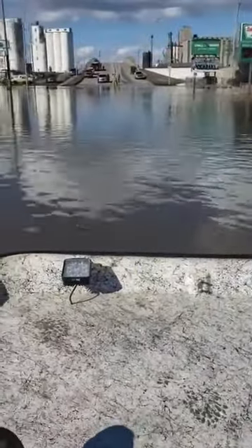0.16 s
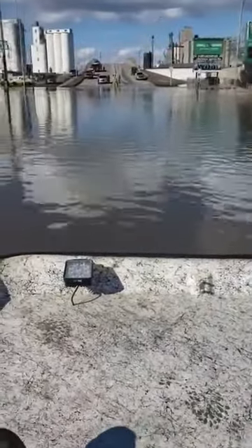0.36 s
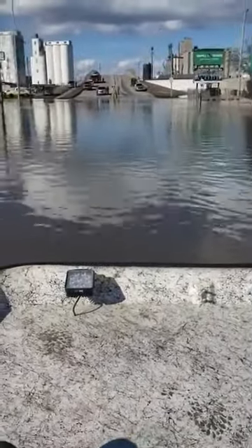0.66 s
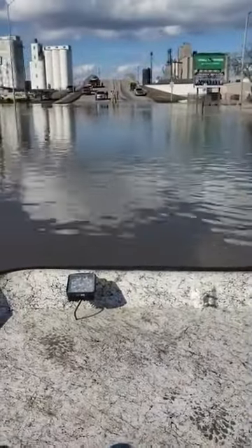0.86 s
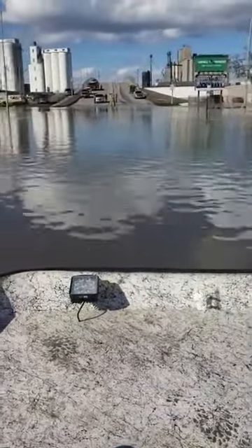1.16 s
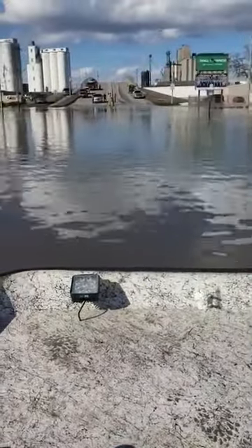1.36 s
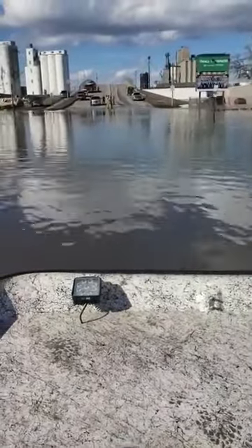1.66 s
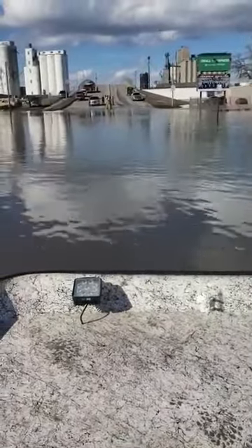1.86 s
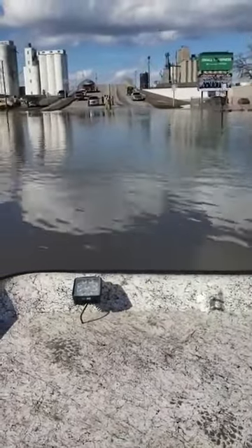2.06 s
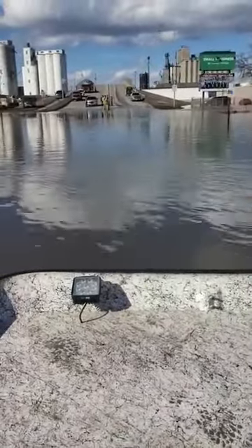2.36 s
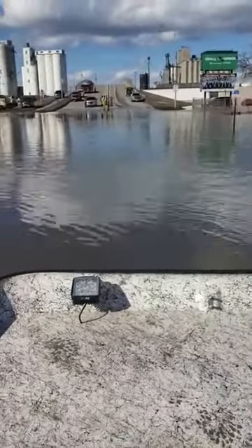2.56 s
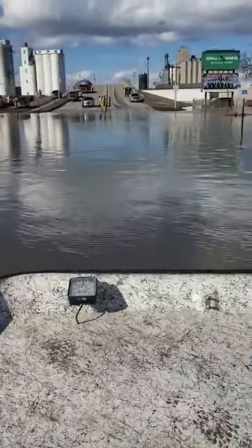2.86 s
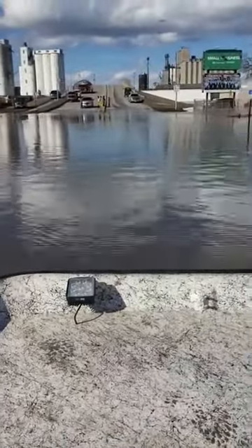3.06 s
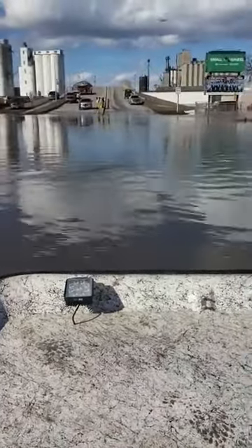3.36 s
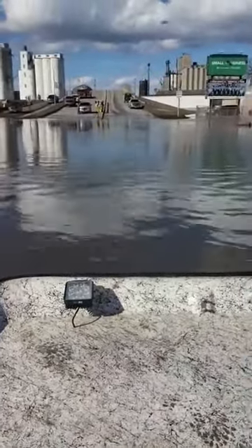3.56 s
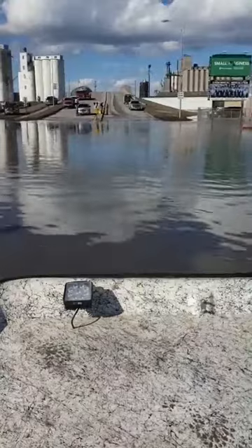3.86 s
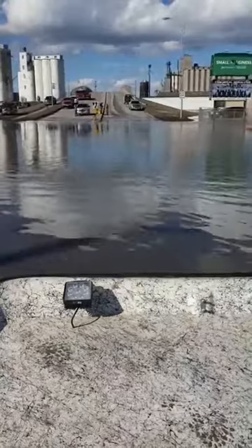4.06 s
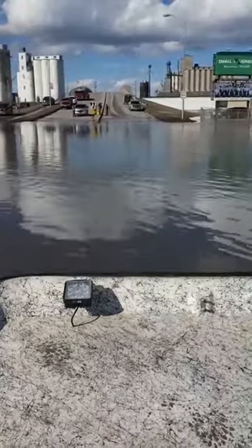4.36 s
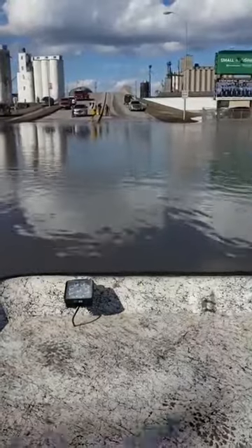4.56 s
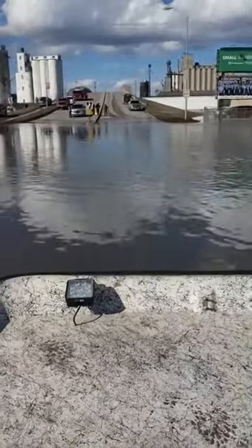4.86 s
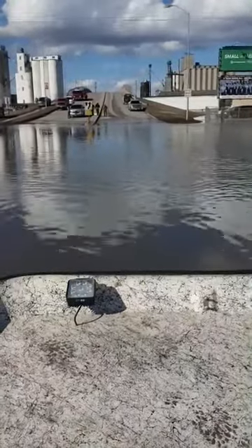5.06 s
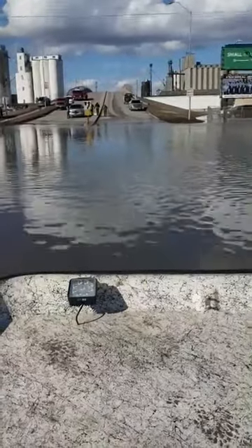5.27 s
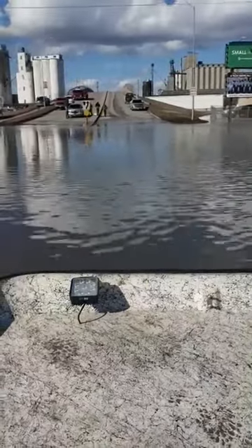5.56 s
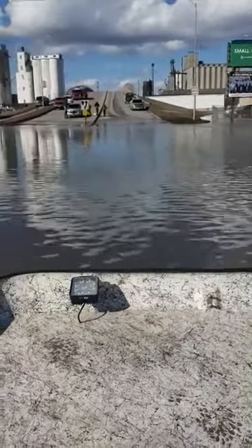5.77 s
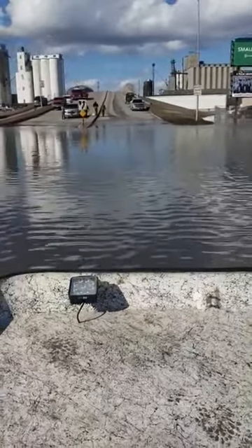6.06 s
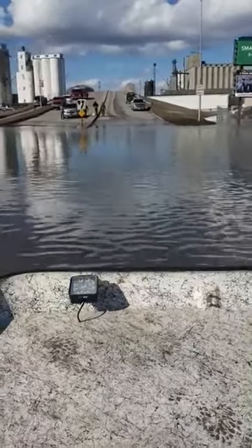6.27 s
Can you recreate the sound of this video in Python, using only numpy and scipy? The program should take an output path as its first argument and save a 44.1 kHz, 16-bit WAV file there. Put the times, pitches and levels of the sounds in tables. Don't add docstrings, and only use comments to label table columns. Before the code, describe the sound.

A continuous low motor hum with blade beating and a breathy air rush, heard from the bow on a two-channel phone. It holds steady, falters and sinks in pitch with thinner spray, growls unevenly at lower speed, then swells and rises without quite reaching its first pitch. Wind gusts bump softly against the microphone throughout; open air, no echo, slightly processed, gritty treble.

```python
import sys
import numpy as np
from scipy import signal
from scipy.io import wavfile
from scipy.ndimage import uniform_filter1d

SR = 44100
rng = np.random.default_rng(int(sys.argv[2]) if len(sys.argv) > 2 else 0)


def bounce(signal):
    frames = np.transpose(np.atleast_2d(signal))
    limited = np.clip(frames, -1, 1)
    pcm = np.round(limited * 32767).astype(np.int16)
    wavfile.write(sys.argv[1], SR, pcm)


def natural_amplitude(level_db):
    exponent = np.asarray(level_db, float) / 20
    return 10 ** exponent


N = 282321
T = np.arange(N) / SR

# t/s, firing rate f/Hz, firing tone level/dB, thrust re full/dB
ENGINE_RUN = [(0, 169.6, -22, 0), (1.3, 169.7, -20.5, 0), (1.65, 169.1, -20, -.5), (1.9, 164.6, -21.5, 0),
              (2.15, 155.7, -23, -1), (2.42, 150.8, -24, -2.5), (2.63, 136.9, -24.5, -4),
              (2.85, 128.9, -23, -4.5), (3.2, 120.7, -23.5, -5.5), (3.6, 117.7, -24, -5),
              (4.0, 117, -22.5, -4.5), (4.45, 117, -21, -3.5), (4.75, 118.3, -16.5, -1.5),
              (5.0, 127.5, -18.5, -2), (5.3, 133.6, -17, -1.5), (5.72, 141, -21.5, -1),
              (6.05, 144.4, -20, 0), (6.4, 137.5, -23, -0.5)]
# t/s, half length/s, level/dB
FALTERS = [
    (2.09, .035, -11),
    (2.58, .1, -10),
]
EXHAUST_ORDERS = [4, 6, 7, 9, 11, 12, 13, 14, 16, 21, 24, 32, 96, 100]
# fast level/dB, slow level/dB
EXHAUST_LEVELS = [(-4, 6.5), (-0.5, 5.5), (1, 5), (-14, 5.5), (-2.5, 4.5), (-22, 1.5), (-9.5, -3.5),
                  (-10.5, -12), (-7, -8), (-12, -2.5), (-9.5, -24), (-14, -13.5), (-18, -19.5), (-24, -44)]
BLADE_ORDERS = [2, *range(4, 17)]
# fast level/dB, slow level/dB
BLADE_LEVELS = [(1.5, 1), (-4.5, 6), (-5, -5.5), (-10.5, -3.5), (-14, -9), (-11.5, -9), (-5, -18),
                (-13.5, -11.5), (-10, -10.5), (-19.5, -10.5), (-15, -9), (-13, -18), (-12.5, -27.5),
                (-15.5, -24.5)]
# f/Hz, density level/dB
WASH_SPECTRUM = [(150, -44.5), (200, -4.5), (300, -4.5), (420, -8.5), (600, -10.5), (850, -11), (1050, -15),
                 (1300, -16), (1600, -23), (2050, -25), (2500, -27.5), (3500, -34), (4500, -60)]
# f/Hz, density level/dB
RUMBLE_SPECTRUM = [(15, -24.5), (30, -15.5), (40, 3), (50, 0.5), (90, -8.5), (150, 6.5), (200, 8.5),
                   (260, -39)]
# f/Hz, density level/dB
HISS_SPECTRUM = [(2000, -18), (3000, -10), (4200, -8), (4800, -3.5), (5250, -1.5), (5550, -6),
                 (5900, -14.5), (6400, -13), (7000, -18), (7800, -23.5), (8300, -22.5), (9000, -50.5)]
# f/Hz, density level/dB
SPRAY_SPECTRUM = [(7000, -24.5), (8000, -13.5), (8500, -1), (8900, -0.5), (9600, -5.5), (10400, -7.5),
                  (11300, -3.5), (12000, -2.5), (12900, -3), (13450, -11), (14100, -7), (14700, -10),
                  (15300, -11), (16000, -10)]
# f/Hz, density level/dB
WIND_SPECTRUM = [(15, -50), (25, -26), (38, -9), (55, -1), (86, 0), (134, -6), (200, -8), (380, -14),
                 (700, -25), (1100, -45)]
# t/s, level/dB, half length/s
GUSTS = [(.4, -32.5, 0.16), (0.846, -30, .12), (1.25, -35, 0.17), (2.242, -29.5, 0.043),
         (2.487, -33, 0.074), (2.886, -32, 0.069), (3.499, -34.5, .08), (3.8, -38.5, 0.1),
         (4.102, -37, 0.17), (4.44, -31.5, 0.12), (4.666, -31, .05), (5.099, -35.5, .06),
         (5.73, -28.5, 0.076), (6.05, -33.5, .12)]
# f/Hz, left-right correlation/1
PORT_LIKENESS = [(60, 1), (300, 0.87), (600, 0.65), (800, 0.84), (1000, 0.25), (1800, 0.42), (3000, 0.33),
                 (4800, .12), (8000, .03)]
# f/Hz, left minus right level/dB
PORT_LEAN = [(60, 4), (110, 4), (200, 3), (380, 2), (700, -2), (1290, -4.0), (2380, 0.5), (4400, 2.5),
             (8120, 9.5), (15000, 11)]
# f/Hz, right port lead/rad
PORT_LEAD = [(200, .05), (600, .6), (800, .35), (1200, -.95), (1800, -2.7), (2800, -2.9), (3700, -3.4),
             (8000, -3.1)]
# f/Hz, threshold re surroundings level/dB
DROP_THRESHOLDS = [(1200, -14), (1600, -4), (2500, -4.5), (4300, -6), (4800, -12), (5600, -14),
                   (5900, -0.5), (6500, -8.5), (7700, -3), (8400, -3), (12800, -8), (13500, -5),
                   (14200, -4), (15000, -1.5), (15400, -0.5)]

SLOW_HZ, FAST_HZ = 125, 170.6
BLADE_RATIO = .3273
FIVE_EIGHTHS_DB, FIVE_QUARTERS_DB = (-9.5, -18), (-24.5, -15)
BLADE_DB, BLADE_DB_PER_HZ, BLADE_LOW_DB = -22.3, .37, -40.5
THIRD_DB = -14
SECOND_START_TURNS, THIRD_START_TURNS = -.09, .21
SMEAR_DB_PER_HZ_S = 0.15
WASH_DB, HISS_DB, SPRAY_DB = -40.5, -51.5, -62
WASH_SHARE, SPRAY_SHARE, MIST_SHARE = 1, .45, 1.3
MIST_HZ, MIST_DB_PER_S = 11000, 0.85
MIST_LAG_S = .35
CALM_DB = -38
GUST_SHARE = 0.21
TOP_HZ, TOP_SHARE = 14400, 1.0
EDGE_HZ, EDGE_ODDS = 15070, .85


def engine(hz, firing_db, turns, fast, overtone_db):
    load_db = uniform_filter1d(firing_db, size=SR // 3)
    falter_db = sum(db * np.exp(-((T - s) / half) ** 4) for s, half, db in FALTERS)
    out = tone(turns, firing_db + falter_db, .6, .1, start=0)
    out += tone(5 / 8 * turns, load_db + blend(fast, *FIVE_EIGHTHS_DB), 1.2, .15, start=0)
    out += tone(5 / 4 * turns, load_db + blend(fast, *FIVE_QUARTERS_DB), 0.96, 0.2)
    return out + overtones(turns, 1 / 8, EXHAUST_ORDERS, EXHAUST_LEVELS, overtone_db, fast)


def propeller(hz, turns, fast, overtone_db):
    blade_db = np.maximum(BLADE_DB + BLADE_DB_PER_HZ * (hz - hz[0]), BLADE_LOW_DB)
    out = tone(BLADE_RATIO * turns, blade_db, .4 + 1.5 * (1 - fast), .1)
    out += tone(3 * BLADE_RATIO * turns, blade_db + THIRD_DB, .6, .1, start=THIRD_START_TURNS)
    return out + overtones(turns, BLADE_RATIO, BLADE_ORDERS, BLADE_LEVELS, overtone_db, fast)


def overtones(turns, step, orders, rows, base_db, fast):
    out = np.zeros(N)
    for k, (fast_db, slow_db) in zip(orders, rows):
        start = SECOND_START_TURNS if k == 2 else None
        waver_rad = .25 if k * step < 1.2 else .6
        out += tone(k * step * turns, base_db + blend(fast, fast_db, slow_db), 3., waver_rad, start)
    return out


def tone(turns, level_db, waver_db, waver_rad, start=None):
    if start is None:
        start = rng.random()
    phase = 2 * np.pi * (turns + start) + waver_rad * drift(14)
    return np.sqrt(2) * natural_amplitude(level_db + waver_db * drift(13)) * np.sin(phase)


def ports(x, lag=7.1, lean_db=.7):
    late = np.interp(np.arange(N) - lag, np.arange(N), x)
    return np.array([natural_amplitude(lean_db / 2) * late, natural_amplitude(-lean_db / 2) * x])


def wash(thrust_db, throb):
    wash_db = WASH_DB + WASH_SHARE * thrust_db
    rumble = natural_amplitude(wash_db + 4.5) * noise(RUMBLE_SPECTRUM, 0.37, size=4096)
    swell = (gusts() / natural_amplitude(CALM_DB)) ** GUST_SHARE
    rush = noise(WASH_SPECTRUM, 1.28, size=2048)
    return rumble + natural_amplitude(wash_db + 5) * swell * (1 + 0.053 * throb) * rush


def hiss(thrust_db, throb):
    level_db = HISS_DB + thrust_db + 0.2 * drift(9.2)
    return natural_amplitude(level_db) * (1 + 0.054 * throb) * noise(HISS_SPECTRUM, 0.89)


def spray(thrust_db):
    drops = natural_amplitude(SPRAY_DB + 0.55 * drift(25)) * noise(SPRAY_SPECTRUM, 0.83)
    highpass = signal.firwin(101, MIST_HZ, pass_zero=False, fs=SR)
    mist = signal.oaconvolve(drops, highpass[None], "same")
    way_db = np.interp(T - MIST_LAG_S, T, thrust_db)
    mist_db = MIST_SHARE * way_db + MIST_DB_PER_S * (T - 2.5)
    return natural_amplitude(SPRAY_SHARE * thrust_db) * (drops - mist) + natural_amplitude(mist_db) * mist


def wind():
    lumps_db = np.array([drift(7.5), drift(7.3)])
    return gusts() * natural_amplitude(lumps_db) * noise(WIND_SPECTRUM, 1.9, .05, size=2048)


def gusts():
    power = sum(natural_amplitude(db) ** 2 * np.exp(-((T - s) / half) ** 2) for s, db, half in GUSTS)
    return np.sqrt(natural_amplitude(CALM_DB) ** 2 + power)


def noise(spectrum, patchy_db, alike=0.86, size=1024):
    hz = np.fft.rfftfreq(size, 1 / SR)
    a, b, c, d, patches = rng.standard_normal((N * 4 // size + 6, len(hz), 5)).T
    patches = evened(uniform_filter1d(uniform_filter1d(patches, size=10, axis=0), size=12, axis=1))
    same = np.clip(alike * read(PORT_LIKENESS, hz), -1, 1)[:, None]
    left, other = a + 1j * b, c + 1j * d
    lead = np.exp(1j * read(PORT_LEAD, hz))[:, None]
    z = np.array([left, same * left * lead + np.sqrt(1 - same ** 2) * other])
    lean_db = read(PORT_LEAN, hz)[:, None] / 2
    colour_db = read(spectrum, hz, -120, -120)[:, None] + patchy_db * patches
    z *= natural_amplitude(colour_db + np.array([lean_db, -lean_db]))
    x = signal.istft(z, nperseg=size, noverlap=size * 3 // 4)[1][:, :N]
    return x / np.sqrt(np.mean(x.mean(0) ** 2))


def drift(top_hz):
    hz, phase = np.geomspace(.3, top_hz, num=20), rng.random(20)
    coarse = T[::256]
    waves = np.sin(2 * np.pi * (np.outer(coarse, hz) + phase)) / np.sqrt(hz)
    return np.interp(T, coarse, evened(waves.sum(1)))


def blend(fast, fast_db, slow_db):
    return fast * fast_db + (1 - fast) * slow_db


def evened(x):
    return x / np.sqrt(np.mean(x ** 2) + 1e-20)


def read(points, hz, below=None, above=None):
    f, value = np.transpose(points)
    return np.interp(np.log(hz + 1), np.log(f + 1), value, below, above)


def curves(rows):
    s, *columns = np.transpose(rows)
    return [np.interp(T, s, c) for c in columns]


def blurred(field, bins, frames):
    return uniform_filter1d(uniform_filter1d(field, bins, axis=0), frames, axis=1)


def starved(x, depth_db=-36, luck_db=3.2, size=2048, count=12):
    hz, t, z = signal.stft(x, SR, nperseg=size, noverlap=size * 3 // 4)
    power = (abs(z) ** 2).sum(0) + 1e-20
    around_db = 10 * np.log10(blurred(power, 24, 60))
    weak_db = 10 * np.log10(blurred(power, 2, 5)) - around_db
    luck = evened(blurred(rng.standard_normal((len(t), len(hz) // count + 1)).T, 1, 5))
    edge_db = read(DROP_THRESHOLDS, hz, -60)[:, None] + luck_db * np.repeat(luck, count, axis=0)[:len(hz)]
    faint_db = around_db.mean(1, keepdims=True) - around_db
    edge_db += TOP_SHARE * (hz > TOP_HZ)[:, None] * faint_db
    keep = natural_amplitude(depth_db / (1 + np.exp(np.clip(3 * (weak_db - edge_db), -40, 40))))
    keep[hz > EDGE_HZ] = evened(uniform_filter1d(rng.standard_normal(len(t)), size=4)) > EDGE_ODDS
    return signal.istft(z * keep, SR, nperseg=size, noverlap=size * 3 // 4)[1][:, :N]


def scene():
    hz, firing_db, thrust_db = curves(ENGINE_RUN)
    turns = np.cumsum(hz) / SR
    fast = np.clip((hz - SLOW_HZ) / (FAST_HZ - SLOW_HZ), 0, 1) ** 1.5
    change_hz_s = uniform_filter1d(abs(np.gradient(hz)) * SR, size=SR // 4)
    overtone_db = WASH_DB + WASH_SHARE * thrust_db - SMEAR_DB_PER_HZ_S * change_hz_s
    throb = np.cos(2 * np.pi * BLADE_RATIO * turns)
    tones = engine(hz, firing_db, turns, fast, overtone_db) + propeller(hz, turns, fast, overtone_db)
    return ports(tones) + wash(thrust_db, throb) + hiss(thrust_db, throb) + spray(thrust_db) + wind()


def roll_off(x):
    return signal.sosfilt(signal.butter(12, 15760, fs=SR, output="sos"), x)


def record(dry):
    mix = starved(dry)
    return roll_off(mix)


dry = scene()
out = record(dry)
bounce(out)
```